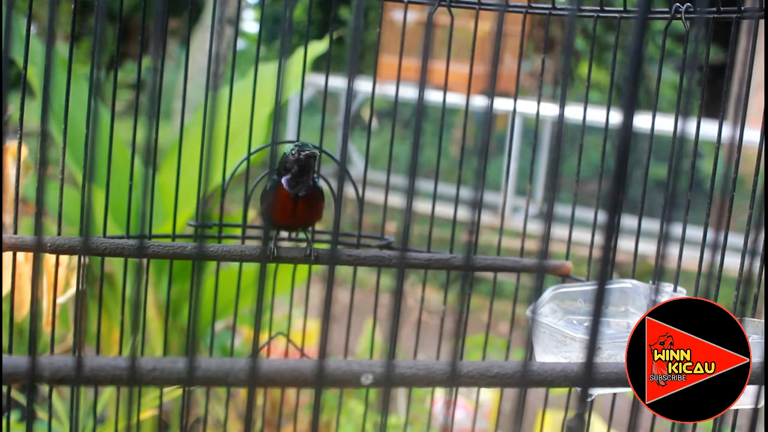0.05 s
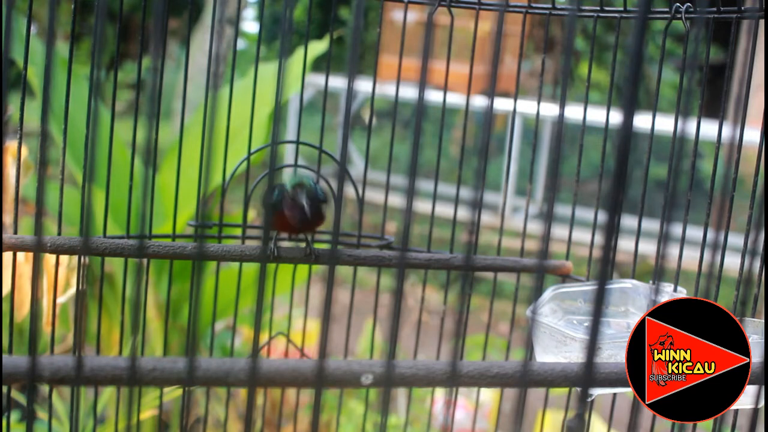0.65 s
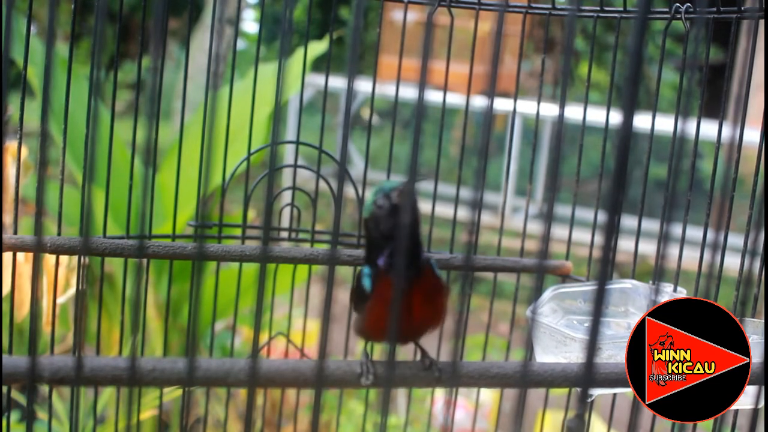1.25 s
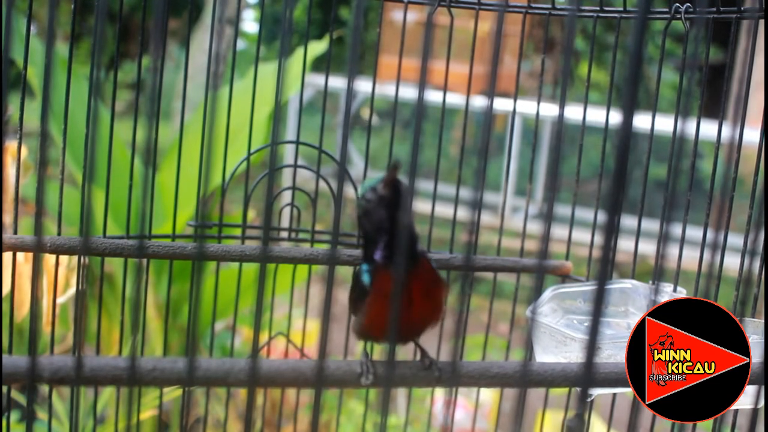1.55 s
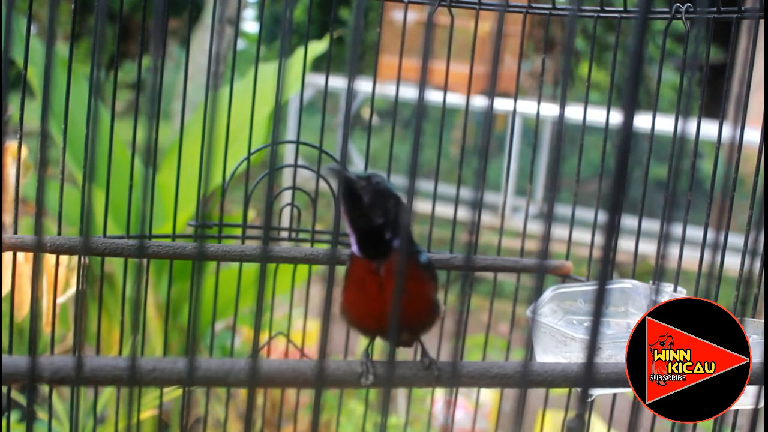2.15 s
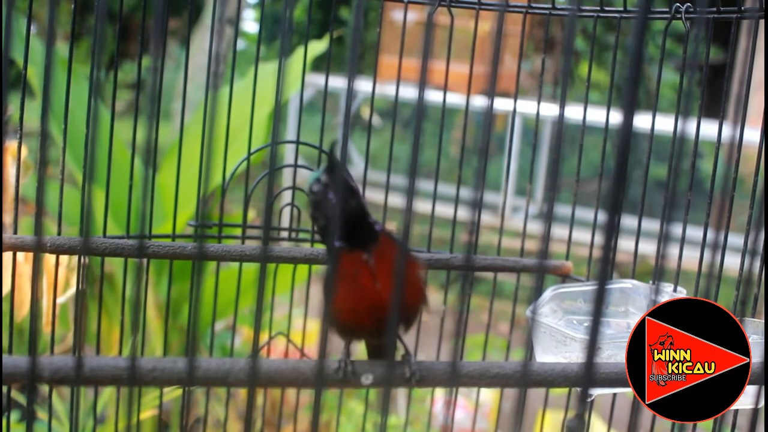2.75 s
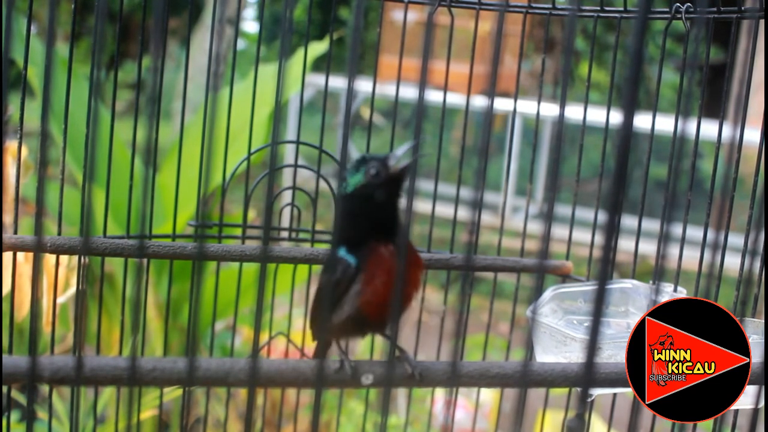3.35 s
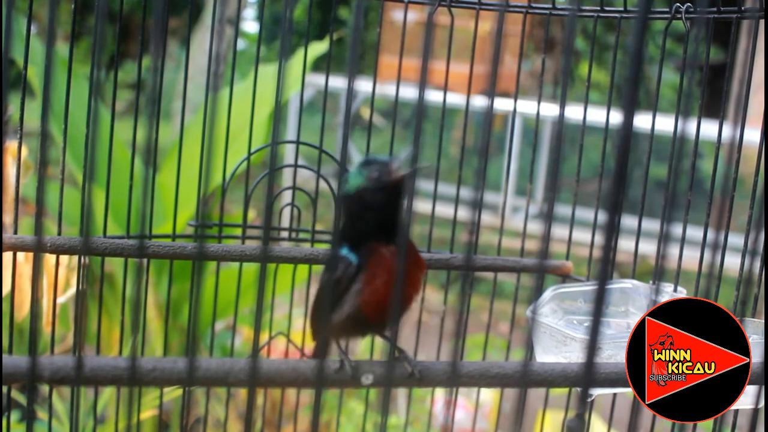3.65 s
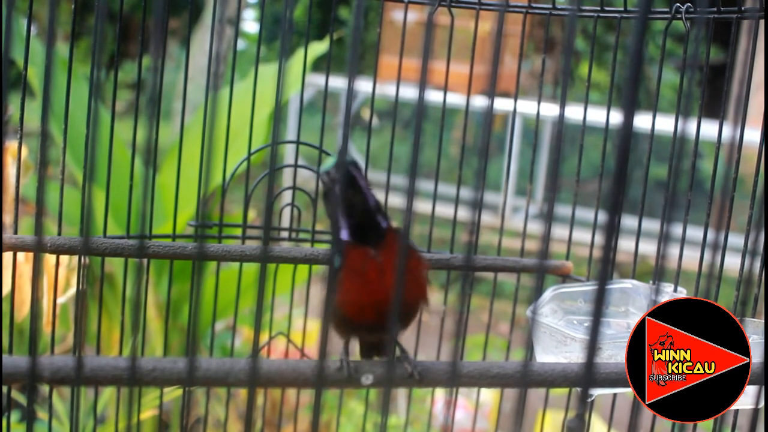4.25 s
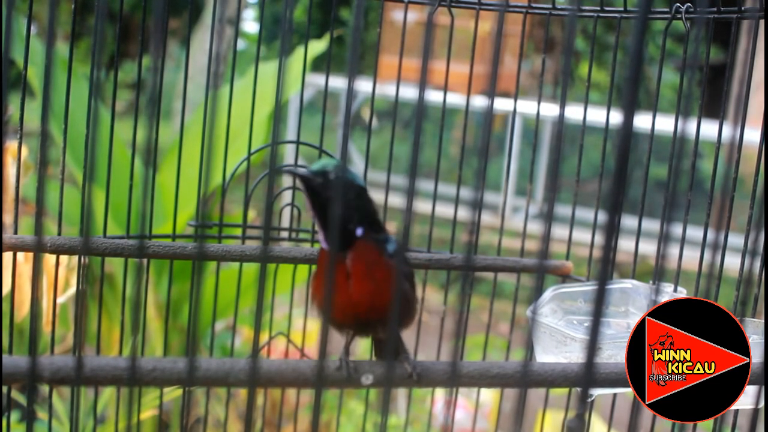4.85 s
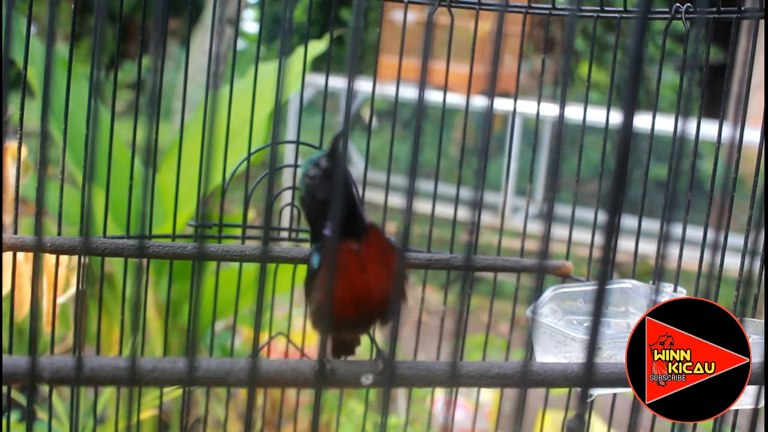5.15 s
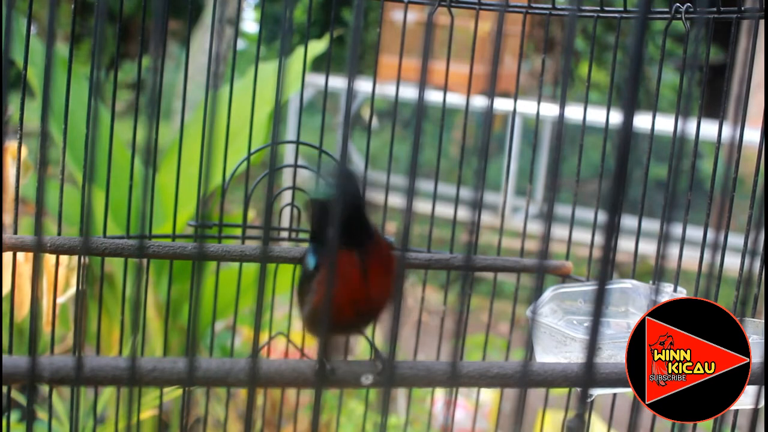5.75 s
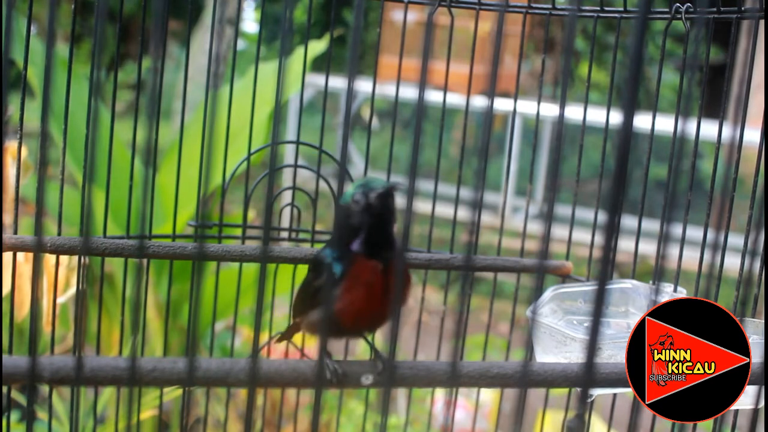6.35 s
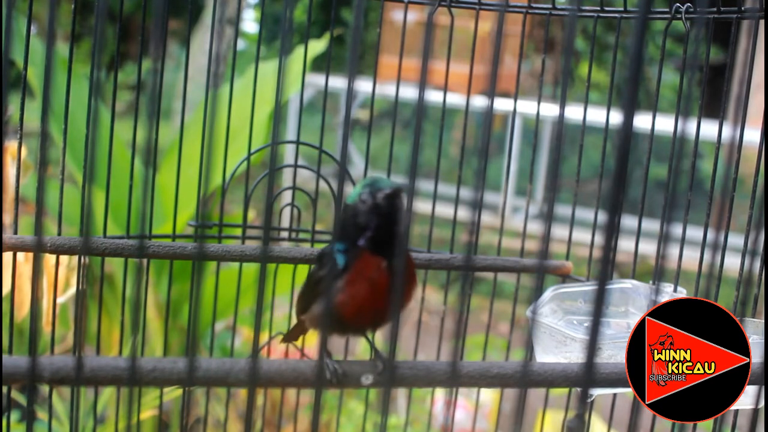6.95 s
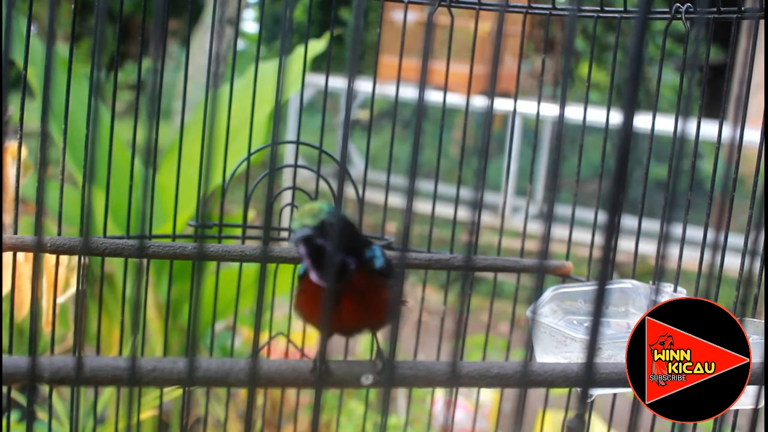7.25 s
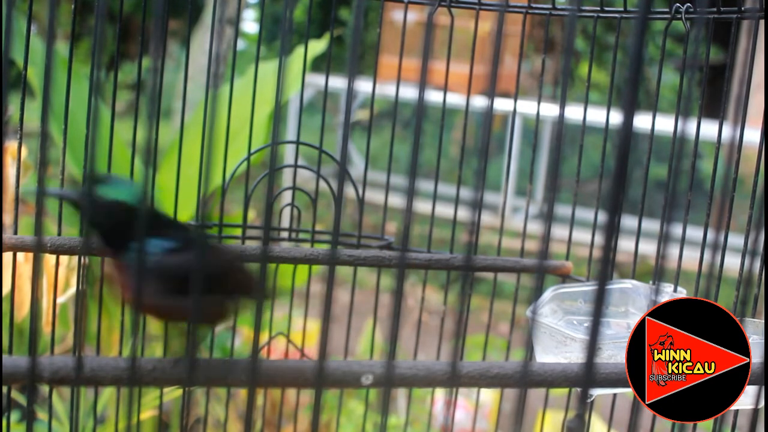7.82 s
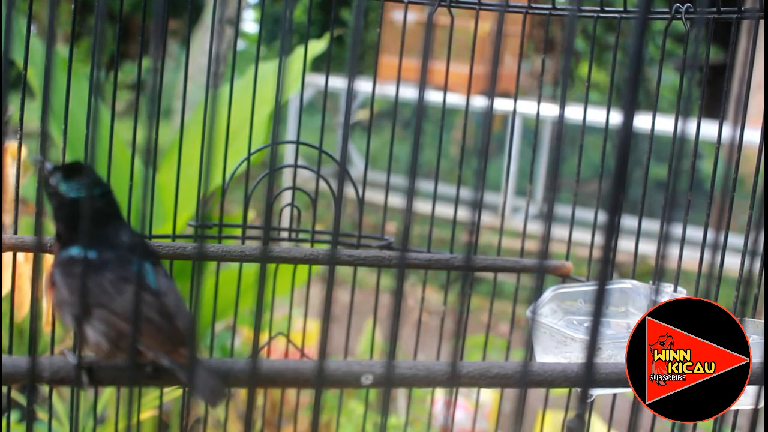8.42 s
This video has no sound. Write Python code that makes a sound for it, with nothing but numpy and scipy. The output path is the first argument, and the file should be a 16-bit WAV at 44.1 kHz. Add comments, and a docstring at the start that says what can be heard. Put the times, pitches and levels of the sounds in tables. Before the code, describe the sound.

A small caged bird gives a few harsh chirps close to the microphone and flutters its wings. It runs into very high paired ticks mixed with a quick warble and thin whistles, then nasal chatter and more whistles and chirps. A second bird whistles faintly far off, and a distant fowl squawks once near the end. A low, steady outdoor rumble lies underneath.

```python
"""Harsh chirps cut through a low outdoor rumble: a caged sunbird, close by, sounding both sides of its
syrinx at once. Its wings flutter; then come high arched ticks, a warble, thin whistles and nasal chatter,
all sung by membranes swinging in its breath. A second bird whistles far off and a distant fowl squawks
once. The cage adds a faint spray of reflections, and the yard puts a soft echo behind the voices."""
import sys
import numpy as np
from scipy import signal
from scipy.fft import rfft, irfft, next_fast_len
from scipy.io import wavfile
from scipy.ndimage import uniform_filter1d, minimum_filter1d, map_coordinates

SR = 44100
rng = np.random.default_rng(int(sys.argv[2]) if len(sys.argv) > 2 else 0)


def bounce(signal):
    """Save signal as a 16-bit WAV file at the path given by the first command-line argument."""
    frames = np.transpose(np.atleast_2d(signal))
    limited = np.clip(frames, -1, 1)
    pcm = np.round(limited * 32767).astype(np.int16)
    wavfile.write(sys.argv[1], SR, pcm)


N = 378378
TOP_HZ = 15900  # band limit

# Levels in the tables are relative: each layer gets its own gain in the mix.
# outdoor rumble and hiss: (frequency [Hz], level [dB])
AIR_SPECTRUM = [(15, -60.5), (25, -22.5), (74, -3), (120, 0), (256, -6.5), (335, -6), (363, -8.5),
                (394, -8.5), (714, -13), (818, -13.5), (4250, -23.5), (5430, -25), (12200, -36.5),
                (13200, -35), (16000, -46)]
# two-voiced chirps; pitches are the low voice's, intervals are high pitch over low:
# (time [s], length [s], crest after [s], start [Hz], knee [Hz], crest [Hz], end [Hz],
#  first interval [ratio], crest interval [ratio], high voice joins after [s], leaves after [s],
#  its lead at the crest [dB], swell [dB], level [dB])
CHIRPS = [(0.1, .095, 0.072, 1857, 2230, 3240, 900, 1.28, 1.174, .015, 0.091, 0.5, 8, -12),
          (0.911, .062, 0.054, 3260, 4020, 5380, 4600, 1.08, 1.48, 0.017, .07, 16, 17, -5.5),
          (1.051, .075, .064, 1597, 4250, 6470, 7000, 1.28, 1.6, 0, 0.053, 4, 6, -7),
          (6.674, 0.049, .036, 2010, 2954, 5370, 5700, 1.18, 1.14, .005, .044, -1, -2, -13.5),
          (8.084, .061, .046, 2200, 3150, 6000, 7000, 1.33, 1.22, 0.00068, 0.045, 4, 4, -5.5)]
# open throat and beak, ringing near 6 kHz: (frequency [Hz], gain [dB])
OPEN_THROAT = [(800, -39), (1500, -22.5), (2400, -15.5), (3400, -8.5), (4200, -2), (6100, 8), (7300, 2.5),
               (8800, -6.5), (11000, -19.5), (15500, -24)]
# wing flicks: (time [s], level [dB])
WING_FLICKS = [(0.722, -21), (0.791, -20), (0.8244, -30.5), (1.2324, -20), (1.314, -23.5), (1.4424, -24),
               (1.5285, -25.5), (1.5943, -23.5), (1.6644, -25), (1.7444, -24.5), (1.7794, -28.5),
               (1.827, -25.5), (1.9044, -24.5)]
# feather rustle: (frequency [Hz], level [dB])
FEATHER_SPECTRUM = [(200, -3.5), (700, -0.5), (1600, 0), (4000, -5.5), (8000, -10), (15000, -44.5)]
# the second chirp's thin tail: (time [s], length [s], start [Hz], middle [Hz], end [Hz], level [dB])
SQUEAL = [(0.971, .017, 6320, 6800, 7050, -9.5)]
# ticks in pairs, soft then loud: (time [s], length [s], crest [Hz], sag [Hz], level [dB])
TICKS = [(2.017, 0.025, 10060, 800, -14), (2.0582, 0.019, 10400, 299, -10.5), (2.41, 0.02, 10100, 700, -16),
         (2.45, 0.018, 10400, 500, -12), (2.6825, 0.026, 10020, 993, -17.5),
         (2.7218, .023, 10030, 100, -10), (2.9935, 0.019, 9900, 705, -17), (3.0365, 0.018, 9950, 647, -11),
         (3.2685, .018, 9680, 650, -19), (3.3088, 0.024, 9900, 450, -13), (3.4, .021, 9760, 451, -18.5),
         (3.4445, 0.024, 10100, 450, -12), (3.53, 0.026, 10060, 548, -18), (3.574, .025, 10200, 650, -13.5),
         (3.678, .032, 9980, 1900, -13), (3.7183, .029, 10280, 800, -11), (3.91, .019, 10150, 703, -17),
         (3.949, 0.026, 10030, 653, -10.5), (4.064, 0.024, 10100, 953, -16.5),
         (4.104, 0.028, 9770, 353, -9)]
# narrowed throat of the warble: (frequency [Hz], gain [dB])
NARROW_THROAT = [(2200, -4), (3500, -1), (4800, 8.5), (5600, 1.5), (7000, -12.5), (8500, -25),
                 (15000, -25.5)]
# the second bird: (time [s], length [s], start [Hz], middle [Hz], end [Hz], level [dB])
FAR_WHISTLES = [(2.28, 0.26, 5200, 4950, 4450, -49), (3.34, 0.15, 5070, 4850, 4530, -49),
                (3.91, 0.079, 4700, 4080, 3600, -48), (6.04, .11, 4770, 5230, 5600, -54),
                (6.36, .07, 5050, 5130, 5200, -53)]
# the sunbird's whistles: (time [s], length [s], arc start [Hz], arc middle [Hz], arc end [Hz], dip [Hz],
#  dip after [s], closing flick [Hz], loudest at [0-1], level [dB])
WHISTLES = [(2.546, 0.091, 2450, 2790, 2960, 0, .04, 1003, .64, -12.5),
            (2.8185, 0.11, 2370, 3005, 3090, 2.5, .04, -300, .68, -10.2),
            (3.128, 0.091, 3720, 3750, 3130, 300, .034, -100, .56, -8),
            (4.252, .068, 4110, 4070, 3930, 310, .045, -200, .52, -6),
            (4.3575, 0.076, 4830, 4450, 3950, 150, .014, -700, .3, -7.5),
            (4.551, 0.11, 3980, 4110, 3510, 210.5, .036, -600, .42, -7.5),
            (4.76, .085, 3900, 3530, 3000, 140, .028, -450, .55, -11),
            (6.537, .034, 3700, 5280, 4750, 0, .04, 0, .85, -16.5),
            (6.569, .031, 4800, 4380, 4150, 2, .04, -100, .2, -10),
            (7.198, .082, 4180, 4020, 4050, 170, .035, -1100, .6, -7.8),
            (7.318, .06, 4130, 4095, 4030, -1.5, .04, -800, .7, -9)]
# their timbre: (harmonic [number], level [dB])
WHISTLE_HARMONICS = [(1, 0.5), (2, -31.5), (3, -26.5), (4, -46), (5, -45)]
# rise-and-fall calls: (time [s], rise length [s], fall after [s], top [Hz], level [dB])
CHATTER = [(5.347, .03, 0.044, 2460, -23), (5.467, 0.031, 0.046, 2440, -21.5),
           (5.581, 0.031, .049, 2490, -21.5), (8.382, .033, .047, 2540, -18.5),
           (8.487, .034, .047, 2440, -18.5)]
# squeaks among the chatter: (time [s], length [s], start [Hz], middle [Hz], end [Hz], level [dB])
SQUEAKS = [(5.703, .0095, 1150, 2200, 4300, -19.5), (5.7115, .017, 4250, 4200, 2900, -15.5),
           (5.733, 0.017, 2650, 2330, 1650, -22.5), (5.826, .033, 3600, 1680, 3050, -25.5),
           (5.857, .03, 3180, 2920, 1650, -21.5), (8.254, .011, 1280, 1223, 800, -24.5),
           (8.277, 0.012, 1150, 1030, 850, -33)]
# half-open beak of the chatter: (frequency [Hz], gain [dB])
HALF_OPEN_BEAK = [(900, -29.5), (1500, -20), (2400, -10.5), (3400, -4), (4600, 1), (6000, 3), (7300, 3.5),
                  (8800, -4.5), (11000, -15.5), (15500, -15)]
# the fowl's two notes: (time [s], length [s], start [Hz], middle [Hz], end [Hz], level [dB])
SQUAWK = [(7.885, .125, 690, 678, 745, -35.5), (7.99, .095, 800, 903, 815, -35.5)]
# the fowl's throat: (frequency [Hz], gain [dB])
FOWL_THROAT = [(400, -33), (750, -1), (1400, 2.5), (2050, -4.5), (2750, -12), (3500, -15), (5000, -42)]
# decay of the yard's echo: (frequency [Hz], time to fall 60 dB [s])
YARD_DECAY = [(500, 1), (3500, 0.32), (7000, 0.3), (10000, 0.33), (16000, 0.069)]


def amp(db):
    """Decibels to gain."""
    return 10 ** (np.asarray(db) / 20)


def along(points, hz):
    """Read a curve on a log frequency axis."""
    frequencies, values = np.transpose(points)
    return np.interp(np.log(np.abs(hz) + 1), np.log(frequencies + 1), values)


def add(track, s, sound):
    """Mix a sound into the track at time s."""
    part = track[max(round(s * SR), 0):][:len(sound)]
    part += sound[:len(part)]


def wobble(n, rate):
    """A smooth random curve, rate knots a second."""
    knots = rng.standard_normal(int(n * rate / SR) + 4)
    return map_coordinates(knots, [np.arange(n) * rate / SR])


def filtered(x, gain):
    """Equalise x by gain(hz)."""
    size = next_fast_len(len(x) + 8192)
    return irfft(rfft(x, size) * gain(np.fft.rfftfreq(size, 1 / SR)), size)[:len(x)]


def noise(spectrum):
    """Coloured noise of rms 1."""
    x = filtered(rng.standard_normal(N), lambda hz: amp(along(spectrum, hz)))
    return x / np.sqrt(np.mean(x ** 2))


def clock(length):
    """Seconds t and share u of the note gone by."""
    t = np.arange(round(length * SR)) / SR
    return t, t / t[-1]


def bend(u, start_hz, middle_hz, end_hz):
    """One smooth arc of pitch through three points."""
    bow_hz = middle_hz - (start_hz + end_hz) / 2
    return start_hz + (end_hz - start_hz) * u + bow_hz * (1 - (2 * u - 1) ** 2)


def swell(u, loudest, first_db, last_db, fullness):
    """Level in dB of one push of air: up from first_db to 0, then down to last_db."""
    away = np.where(u < loudest, 1 - u / loudest, (u - loudest) / (1 - loudest))
    edge = amp(np.where(u < loudest, first_db, last_db))
    return 20 * np.log10(1 - (1 - edge) * np.abs(away) ** fullness)


def slurs(rows, loudest, first_db, last_db):
    """Simple notes (time, pitch, level): one arc of pitch under one push of air."""
    for s, length, *arc_hz, db in rows:
        t, u = clock(length)
        yield s, bend(u, *arc_hz), db + swell(u, loudest, first_db, last_db, fullness=2.1)


def swing(hz, jitter):
    """Phase of a tone whose pitch trembles by the share jitter."""
    return 2 * np.pi * np.cumsum(hz * (1 + jitter * wobble(len(hz), rate=1400))) / SR


def unsettled(n, settle_s):
    """1 at the onset, dying away as the membranes lock into a regular cycle."""
    return np.exp(-(np.arange(n) / SR / settle_s) ** 2)


def voiced(partials, db, attack_s):
    """Sum (pitch, phase, gain) partials into a note of level db with quick fades."""
    wave = sum(gain * (hz < TOP_HZ) * np.sin(phase) for hz, phase, gain in partials)
    power = sum(gain ** 2 for _, _, gain in partials) / 2
    t = np.arange(len(db)) / SR
    fades = np.clip(np.minimum(t / attack_s, t[::-1] / 0.0011), 0, 1)
    return wave / np.sqrt(power) * amp(db) * fades


def air(bed_db=-39, whine_hz=13270, whine_db=-68):
    """A steady bed of outdoor rumble and hiss, with a thin wavering whine far above."""
    whine = np.sin(swing(whine_hz + 45 * wobble(N, rate=4), jitter=0.005))
    bed = amp(bed_db + 0.9 * wobble(N, rate=3.85)) * noise(AIR_SPECTRUM)
    return bed + amp(whine_db + 3 * wobble(N, rate=9)) * whine


def click(db, decay_s, centre_hz=7000):
    """The tiny broadband snap of the syrinx bursting open."""
    t = np.arange(SR // 200) / SR
    burst = 2 * wobble(len(t), rate=5500) * np.sin(2 * np.pi * centre_hz * t)
    return amp(db) * np.exp(-t / decay_s) * burst


def chirp_notes(surge_s=0.017, switch_s=0.0013, muted_db=28, attack_s=0.009, release_s=0.011, edge_db=13):
    """Both voices creep up, then surge to a crest; the high one sounds for part of the way."""
    for (s, length, crest_s, start_hz, knee_hz, crest_hz, end_hz, first_interval, crest_interval,
         joins_s, leaves_s, lead_db, swell_db, db) in CHIRPS:
        t, u = clock(length)
        log_pitches = np.log([start_hz, knee_hz, crest_hz, end_hz])
        low_hz = np.exp(np.interp(t, [0, crest_s - surge_s, crest_s, length], log_pitches))
        low_hz = uniform_filter1d(low_hz, size=200, mode="nearest")
        effort = np.minimum(t / crest_s, 1)
        high_hz = low_hz * (first_interval + (crest_interval - first_interval) * effort)
        high_on = (np.tanh((t - joins_s) / switch_s) - np.tanh((t - leaves_s) / switch_s)) / 2
        balance_db = lead_db * effort ** 3 - muted_db * (1 - high_on)
        edges = np.maximum(1 - t / attack_s, 0) ** 2 + np.maximum(1 - (length - t) / release_s, 0) ** 2
        yield s, low_hz, high_hz, balance_db, db - swell_db * (1 - effort) - edge_db * edges


def chirps(coupling_db=-8, lock_hz=600, jitter=0.0082, rasp=0.028, scratch_db=-23, resonance=0.4):
    """Both sides of the syrinx share one airflow, so their sum and difference tones fill the throat."""
    out = np.zeros(N)
    for s, low_hz, high_hz, lead_db, db in chirp_notes():
        gap_db = np.abs(lead_db)
        clash = amp(-gap_db / 2) * unsettled(len(db), settle_s=0.03)  # equal sides disturb each other
        tremble = jitter + rasp * clash
        low, high = swing(low_hz, tremble), swing(high_hz, tremble)
        low_db, high_db = np.minimum(-lead_db, 0), np.minimum(lead_db, 0)
        rolloff_db = -5 - 0.15 * gap_db  # a lone voice is purer
        # close pitches pull hardest
        sideband_db = coupling_db * np.maximum((high_hz - low_hz) / lock_hz, 0.8)
        partials = []
        for order in range(1, 7):
            for n in range(-1, order + 4):
                m = order - n
                hz = m * low_hz + n * high_hz
                phase = m * low + n * high + rng.uniform(0, 2 * np.pi)
                source_db = abs(m) * low_db + abs(n) * high_db + rolloff_db * (order - 1)
                source_db -= 2 * sideband_db * (min(m, 0) / order + min(n, 0))  # sidebands spread upwards
                source_db += 2 * wobble(len(db), rate=130)
                partials.append((hz, phase, amp(source_db + along(OPEN_THROAT, hz))))
        passed_db = 10 * np.log10(sum(gain ** 2 for _, _, gain in partials))
        db = db + resonance * (passed_db - passed_db.mean())  # louder across the throat's resonance
        turbulence = amp(db + scratch_db - gap_db / 2) * rng.standard_normal(len(db))
        add(out, s, voiced(partials, db, attack_s=0.0012) + turbulence * np.sin(low + high))
        add(out, s, click(-31, decay_s=0.002, centre_hz=5200))
    return out


def wings(rise_s=0.01, lead_s=0.0096, grain_db=2):
    """Each flick of the feathers is a short puff of uneven rustle."""
    puffs = np.zeros(N)
    age = np.arange(SR // 10) / SR / rise_s
    for s, db in WING_FLICKS:
        add(puffs, s - lead_s, amp(db) * (age * np.exp(1 - age)) ** 1.2)
    return puffs * amp(grain_db * wobble(N, rate=220)) * noise(FEATHER_SPECTRUM)


def pure_voice(notes, jitter, harmonics=((1, 0),), strain_db=-7, fray_db=-41):
    """One membrane sings a nearly pure line that frays in patches where it is pushed hardest."""
    out = np.zeros(N)
    for s, hz, db in notes:
        strain = 0.002 * amp(1.9 * np.minimum(db - strain_db, 2))
        phase = swing(hz, jitter + strain)
        even_db = -7 * np.log2(hz / 2900)  # a taut membrane swings more symmetrically
        partials = []
        for k, level_db in harmonics:
            shimmer_db = 2.5 * (k > 1) * wobble(len(hz), rate=45)
            partials.append((k * hz, k * phase, amp(level_db + even_db * (k % 2 == 0) + shimmer_db)))
        patches_db = 6 * wobble(len(hz), rate=70)
        fray = amp(fray_db + db - db.max() + patches_db) * wobble(len(hz), rate=3500)
        add(out, s, voiced(partials, db, attack_s=0.00062) * (1 + fray))
        add(out, s, click(db[0] - 24, decay_s=0.0004))
    return out


def squeal():
    """One membrane tops off the second chirp with a thin rising tone."""
    return pure_voice(slurs(SQUEAL, loudest=0.15, first_db=-2, last_db=-9.5), jitter=0.007)


def ticks(hold_s=0.006, usual_db=-12.5, doubling_db=13):
    """Each tick snaps open, shoots up to a crest near 10 kHz, then sags as the pressure drops."""
    out = np.zeros(N)
    for s, length, crest_hz, sag_hz, db in TICKS:
        t, u = clock(length)
        effort = 2 ** ((db - usual_db) / doubling_db)  # loud ticks climb further and for longer
        climb_hz = effort * 2130 * np.exp(-t / (effort * 0.003))
        snap_hz = 2200 * np.exp(-t / 0.00016)
        sag = np.clip((t - hold_s) / (length - hold_s), 0, 1) ** 2
        hz = crest_hz - climb_hz - snap_hz - sag_hz * sag
        level_db = db + swell(u, loudest=0.3, first_db=-5.5, last_db=-12.5, fullness=1.8)
        add(out, s, voiced([(hz, swing(hz, jitter=0.0039), 1)], level_db, attack_s=0.00055))
        add(out, s, click(db - 16, decay_s=0.0005))
    return out


def nasal_voice(notes, throat, slope_db, jitter, rasp=0):
    """A pulsed voice sweeps its harmonics through the throat; rasp roughens slack, low onsets."""
    out = np.zeros(N)
    for s, hz, db in notes:
        chaos = rasp * unsettled(len(hz), settle_s=0.016) * min(1, (1000 / hz[0]) ** 2)
        phase = swing(hz, jitter + chaos)
        partials = [(k * hz, k * phase, amp(along(throat, k * hz) - slope_db * np.log2(k)))
                    for k in range(1, 13)]
        flutter_db = 20 * chaos * wobble(len(hz), rate=1400)
        add(out, s, voiced(partials, db + flutter_db, attack_s=0.0012))
    return out


def warble(s=2.1345, start_hz=4599, settled_hz=2990, vibrato_hz=62.5, from_s=0.0328, until_s=0.123):
    """A slide down into fast vibrato, sung through a narrowed throat; it stops on a low swing."""
    t, u = clock(0.129)
    slide_hz = settled_hz + (start_hz - settled_hz) * np.exp(-t / 0.022)
    push = np.exp(-((t - 0.1) / 0.014) ** 2)  # a last push of air widens the swings
    depth_hz = 500 * (1 - np.exp(-np.maximum(t - from_s, 0) / 0.007)) + 260 * push
    turn = 2 * np.pi * vibrato_hz * (np.minimum(t, until_s) - from_s)
    hz = slide_hz + depth_hz * np.sin(turn + 0.35 * np.sin(turn))  # rises faster than it falls
    db = -16.5 + 3 * push + swell(u, loudest=0.6, first_db=-4, last_db=-3, fullness=1.7)
    return nasal_voice([(s, hz, db)], NARROW_THROAT, slope_db=3.5, jitter=0.004)


def far_bird():
    """A second bird's membrane draws faint, trembling glides."""
    return pure_voice(slurs(FAR_WHISTLES, loudest=0.45, first_db=-7, last_db=-6.5), jitter=0.018)


def whistles(dip_s=0.015, flick_s=0.0032):
    """Each whistle is an arc of pitch that may dip on the way, and flicks aside as the syrinx closes."""
    notes = []
    for s, length, *arc_hz, dip_hz, dip_after, flick_hz, loudest, db in WHISTLES:
        t, u = clock(length)
        dip = np.exp(-((t - dip_after) / dip_s) ** 2)
        closing = np.exp((t - t[-1]) / flick_s)
        hz = bend(u, *arc_hz) - dip_hz * dip + flick_hz * closing
        breath_db = swell(u, loudest, first_db=-13.5, last_db=-6.5, fullness=1.3)
        notes.append((s, hz, db + breath_db - 11 * closing))
    return pure_voice(notes, jitter=0.0026, harmonics=WHISTLE_HARMONICS)


def chatter(slack_hz=784, knee=0.3, knee_width=0.12, fall_s=0.0145):
    """Through a half-open beak, calls rise from a slack rasp, break off and fall, among squeaks."""
    notes = []
    for s, length, fall_after, top_hz, db in CHATTER:
        t, u = clock(length)
        rise_hz = slack_hz + (top_hz - slack_hz) / (1 + np.exp((knee - u) / knee_width))
        rise_db = db + swell(u, loudest=0.42, first_db=-11, last_db=-23, fullness=1.2)
        t, u = clock(fall_s)
        fall_hz = top_hz * (0.84 - 0.41 * u ** 2)
        fall_db = db + swell(u, loudest=0.5, first_db=-13.5, last_db=-10.5, fullness=1.6)
        notes += [(s, rise_hz, rise_db), (s + fall_after, fall_hz, fall_db)]
    notes += slurs(SQUEAKS, loudest=0.37, first_db=-4, last_db=-8)
    return nasal_voice(notes, HALF_OPEN_BEAK, slope_db=8, jitter=0.0088, rasp=0.1)


def fowl():
    """A hoarse two-note squawk: unsteady pulses through a throat that rings near 1.4 kHz."""
    notes = slurs(SQUAWK, loudest=0.34, first_db=-7, last_db=-1.5)
    return nasal_voice(notes, FOWL_THROAT, slope_db=0, jitter=0.033)


def cage(x, t60=0.078, gap_s=0.0015):
    """Bars, perch and floor send back a quick spray of copies."""
    t = np.arange(SR // 10) / SR
    spray = rng.standard_normal(len(t)) * amp(-60 * t / t60) * (t > gap_s)
    return signal.fftconvolve(x, spray / np.linalg.norm(spray))[:N]


def yard(x, gap_s=0.005):
    """Scattered echoes from walls and plants; the treble dies first."""
    hz, t, spectrum = signal.stft(rng.standard_normal(SR // 2), SR, nperseg=256)
    decay = amp(-60 * t / along(YARD_DECAY, hz)[:, None])
    _, tail = signal.istft(spectrum * decay, SR, nperseg=256)
    tail *= np.arange(len(tail)) / SR > gap_s
    return signal.fftconvolve(x, tail / np.linalg.norm(tail))[:N]


def scene():
    """The sunbird sits up front, almost dry; the distant voices are much wetter."""
    near = amp(0.1) * ticks() + amp(-0.85) * chirps() + whistles() + squeal() + warble()
    near += amp(1.5) * chatter() + amp(-12.5) * wings()
    far = fowl() + far_bird()
    foreground = near + amp(-18.5) * cage(near) + amp(-25) * yard(near)
    background = amp(-1.5) * far + amp(-4) * yard(far) + air()
    return (foreground + background)[None]


def record(dry, ceiling=0.9):
    """A limiter holds down the loudest notes; everything above the band limit is cut."""
    needed = np.minimum(1, ceiling / (np.abs(dry[0]) + 1e-9))
    gain = uniform_filter1d(minimum_filter1d(needed, size=400), size=300)
    return filtered(dry[0] * gain, lambda hz: hz < TOP_HZ)[None]


dry = scene()
out = record(dry)
bounce(out)
```